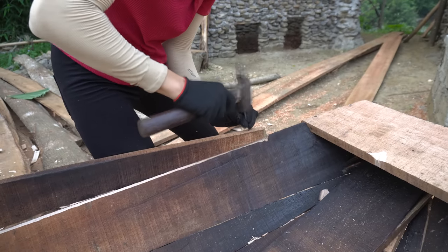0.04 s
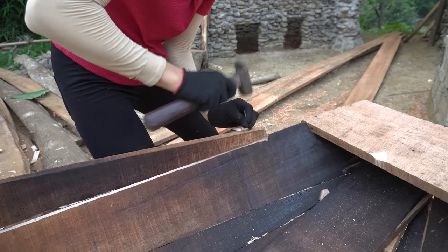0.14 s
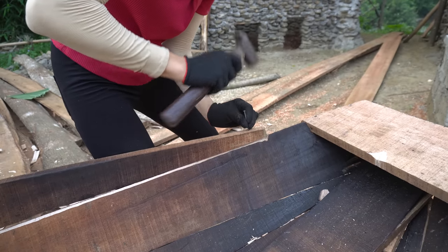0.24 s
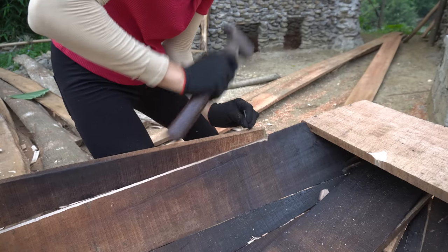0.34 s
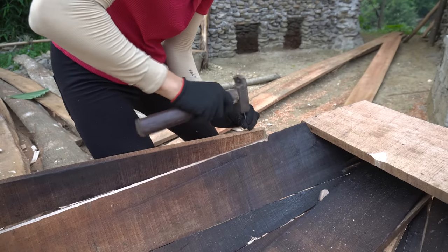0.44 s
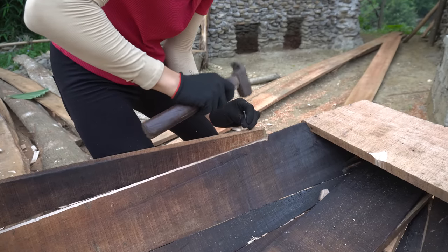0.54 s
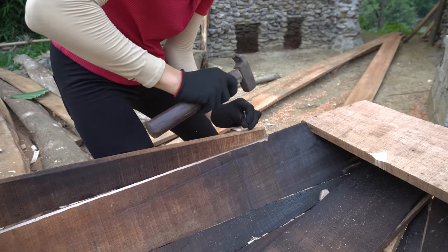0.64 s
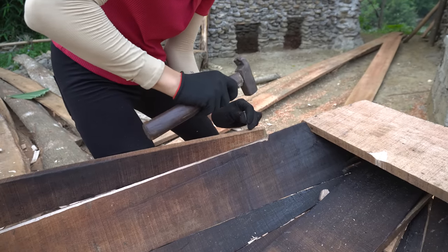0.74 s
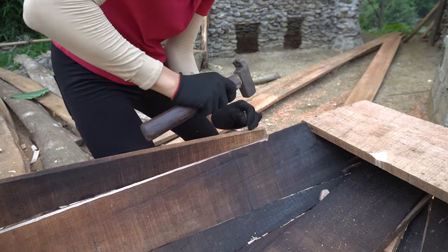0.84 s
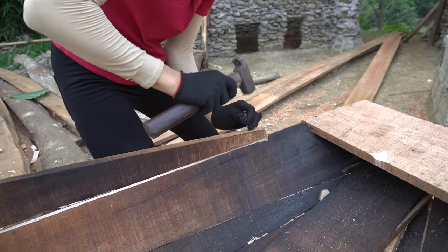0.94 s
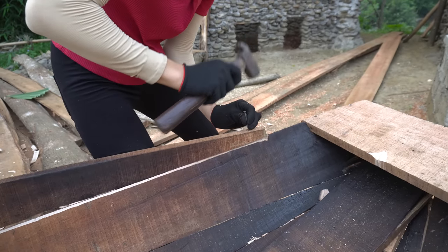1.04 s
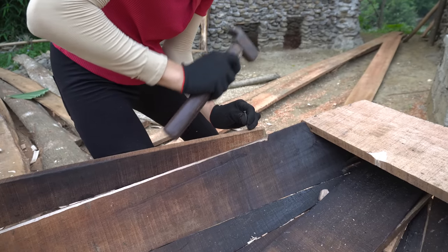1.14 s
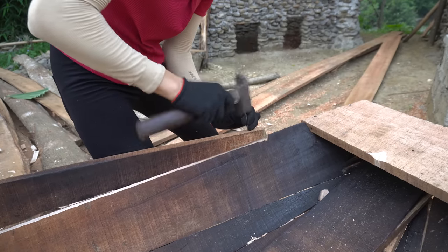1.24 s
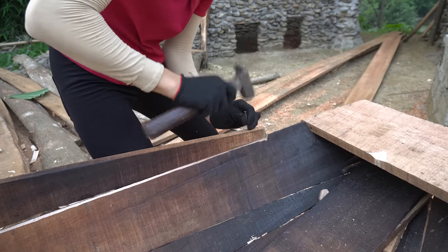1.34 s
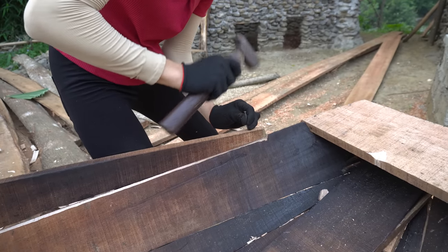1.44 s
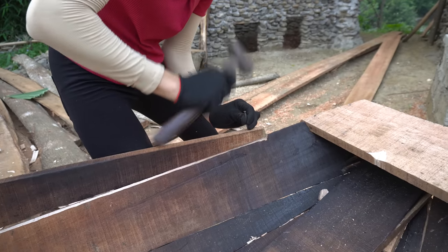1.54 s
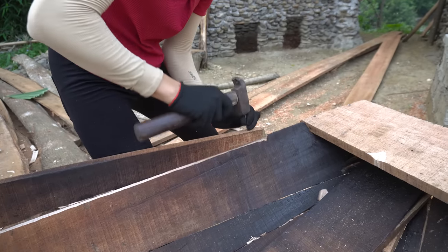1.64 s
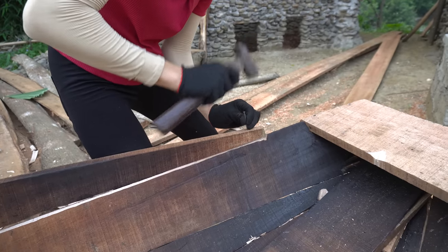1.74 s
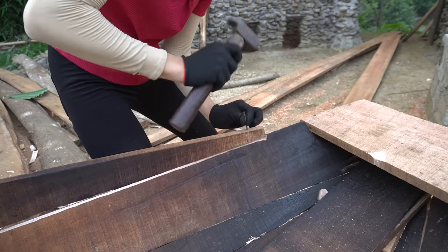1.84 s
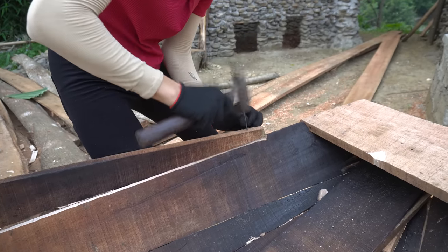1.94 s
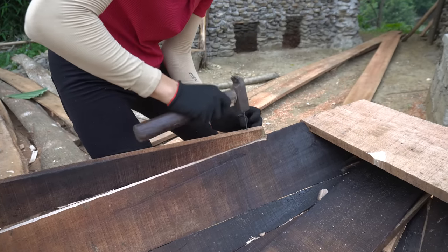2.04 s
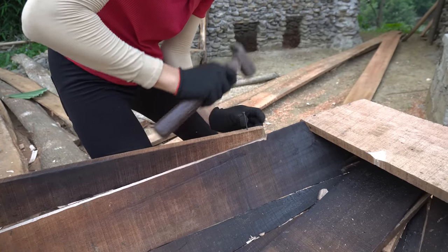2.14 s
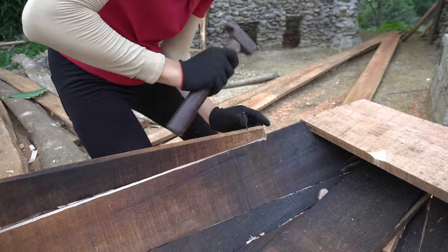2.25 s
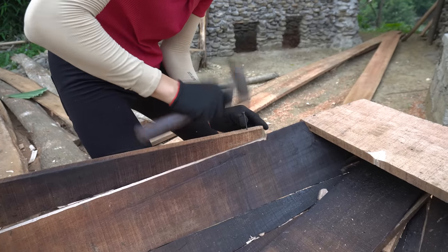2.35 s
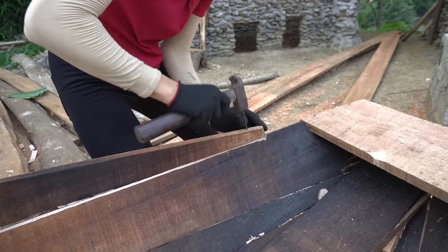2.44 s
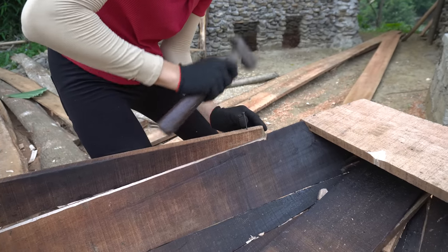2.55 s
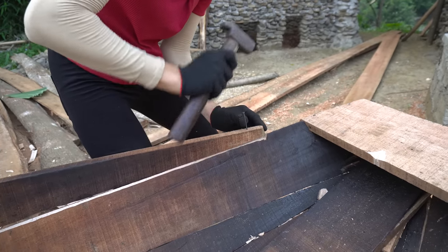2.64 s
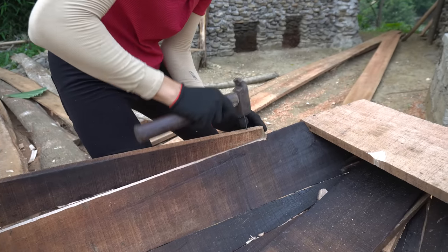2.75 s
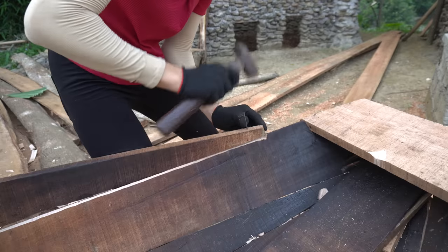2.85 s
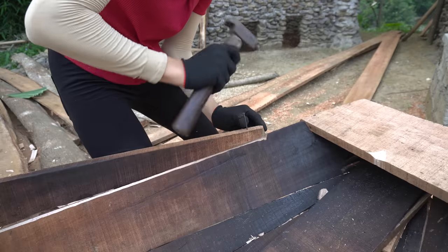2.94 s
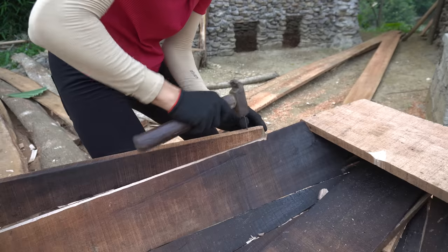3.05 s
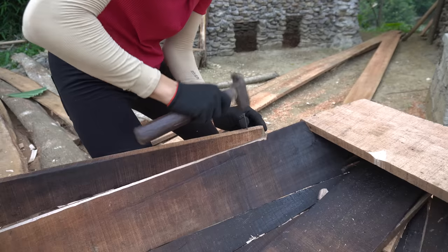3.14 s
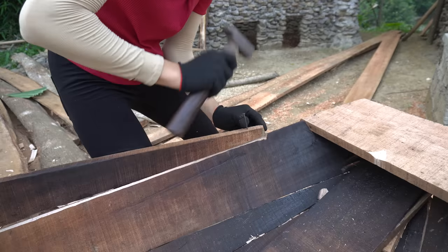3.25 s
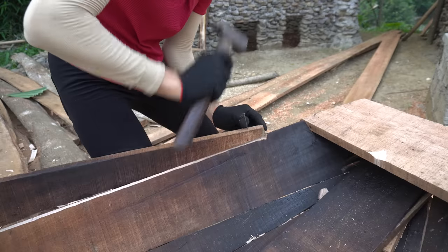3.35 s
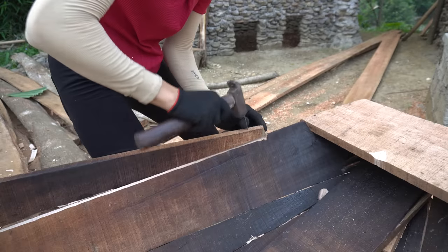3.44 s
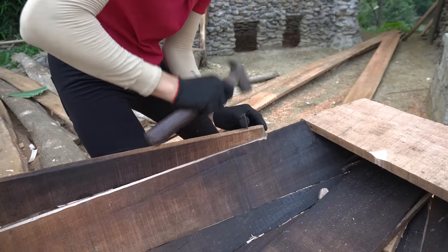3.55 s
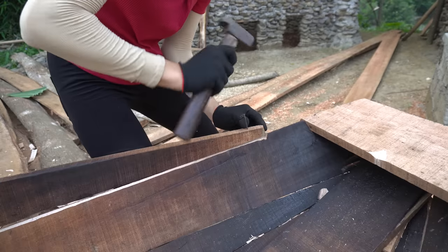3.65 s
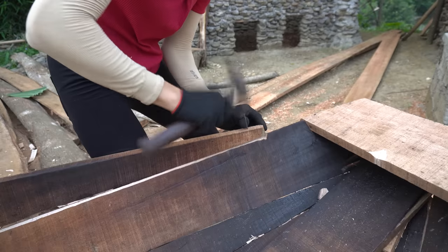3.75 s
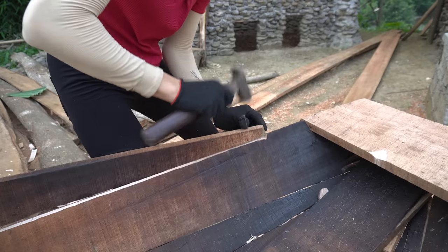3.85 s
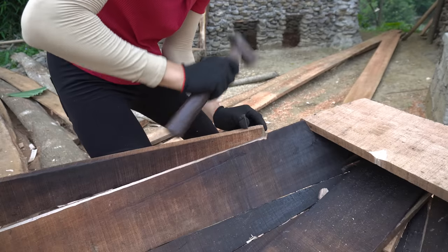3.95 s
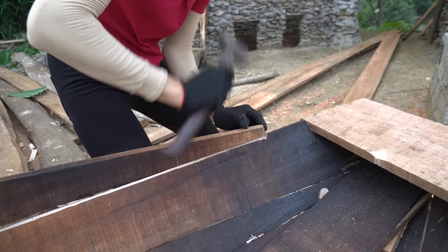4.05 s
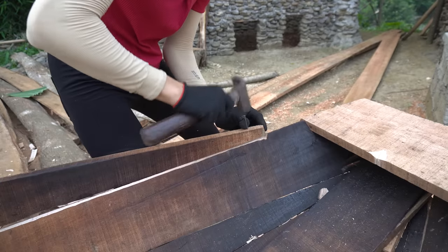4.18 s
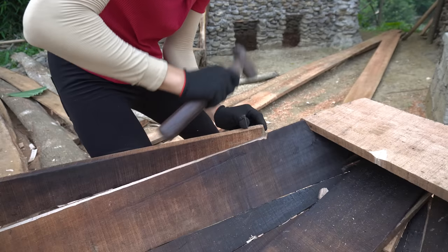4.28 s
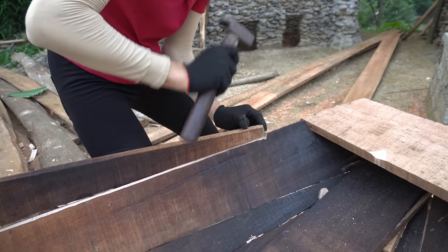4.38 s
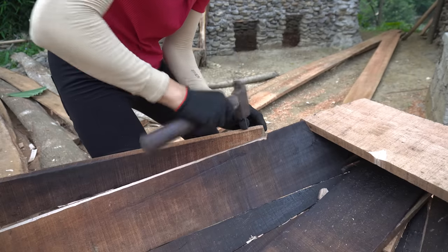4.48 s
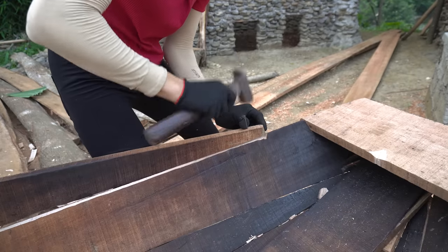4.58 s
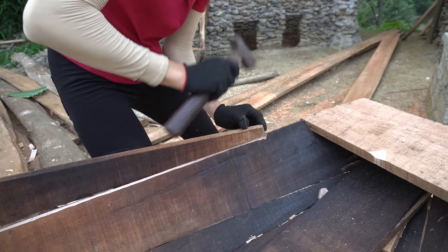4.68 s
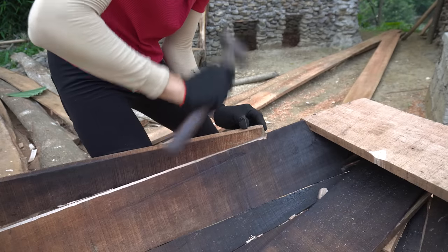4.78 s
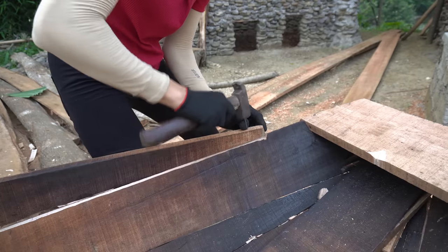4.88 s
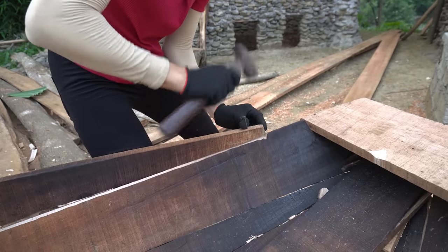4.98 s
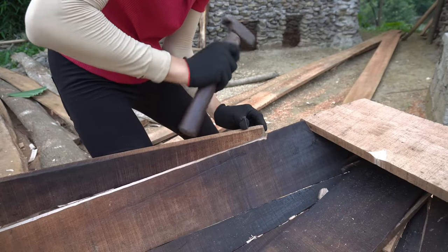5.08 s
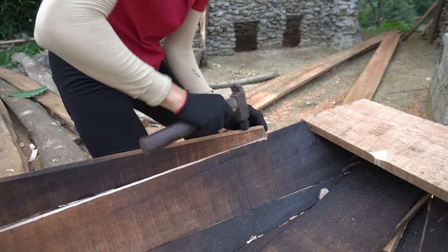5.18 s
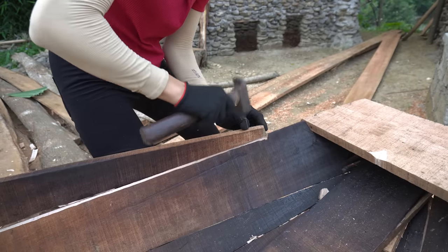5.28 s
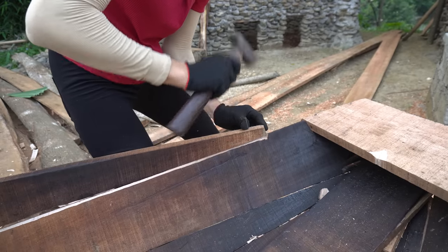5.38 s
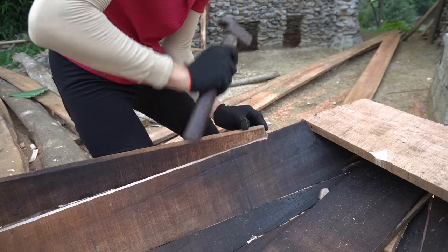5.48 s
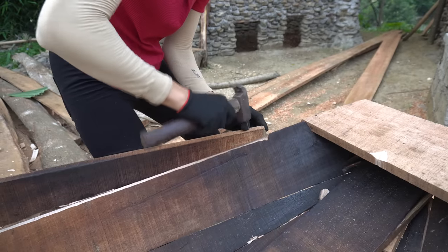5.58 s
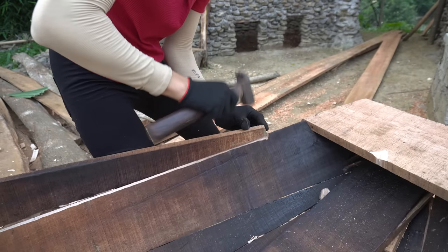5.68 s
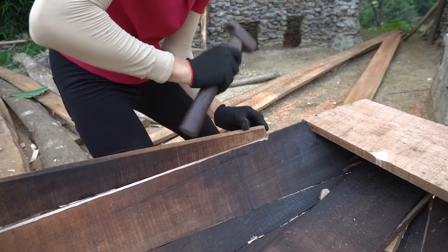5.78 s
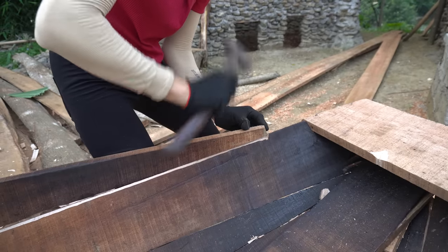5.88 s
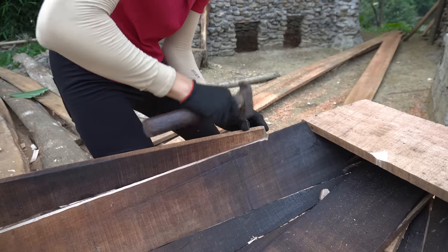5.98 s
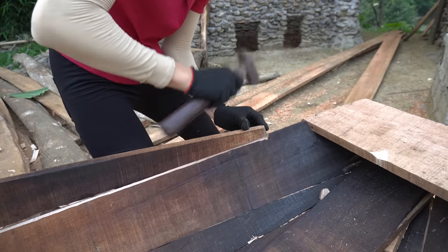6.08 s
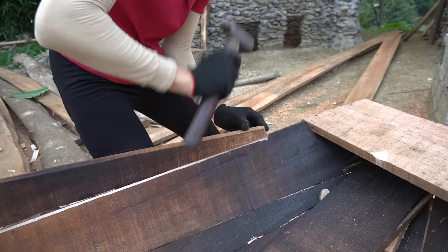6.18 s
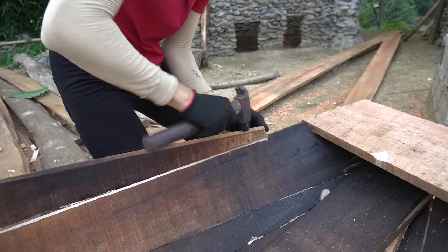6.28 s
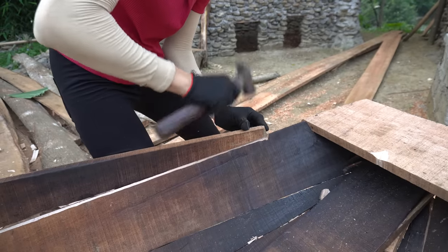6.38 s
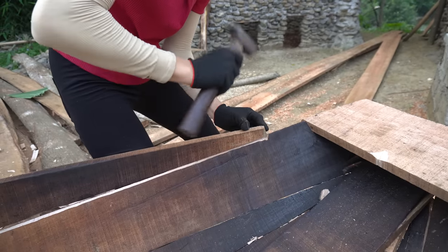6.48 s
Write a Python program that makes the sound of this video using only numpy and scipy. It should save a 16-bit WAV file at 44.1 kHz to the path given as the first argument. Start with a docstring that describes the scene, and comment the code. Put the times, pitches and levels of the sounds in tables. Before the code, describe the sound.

Loud, close hammering on a hollow wooden boat hull: sharp steel ticks, woody cracks and a squashed boom swelling just after each attack. After two opening blows and a short gap, the beat stays even until the end, getting brighter as the nail tightens and more hollow at the last. Sleeve cloth rustles faintly; a stone wall returns a dim echo. Distant birds and thin insect hiss sit in the quiet open air.

```python
"""In a farmyard, a hammer drives a nail into the end of a wooden boat's hull planks, close to two microphones.
Each blow is a modal impact: steel ticks, the plank is shoved, the hull booms; yard and stone wall answer.
The blows brighten as the nail grips, and turn hollow and sharp-edged as it sinks home.
A limiter squashes each attack, so the boom swells after it. Sleeve and glove rustle as shaped noise.
Far birds are gliding sines; the outdoor air and the insects are filtered noise."""
import sys
import numpy as np
from scipy import signal
from scipy.fft import rfft, irfft, next_fast_len
from scipy.io import wavfile
from scipy.ndimage import uniform_filter1d, minimum_filter1d

SR = 44100
rng = np.random.default_rng(int(sys.argv[2]) if len(sys.argv) > 2 else 0)


def master_out(mix):
    """Clip the mix to full scale and print it as 16-bit PCM to the path in sys.argv[1]."""
    frames = np.transpose(np.atleast_2d(mix))
    ceiling = np.clip(frames, -1, 1)
    pcm = np.round(ceiling * 32767).astype(np.int16)
    wavfile.write(sys.argv[1], SR, pcm)


N = 287532  # length in samples
T = np.arange(SR) / SR  # time since a blow, s

# hammer blows: t/s, force level/dB, ring of the steel head/dB relative to the force,
# sleeve rustle on the downswing/dB
BLOWS = [(0.0497, -4.5, -44, -48), (.422, -4.5, -46, -54), (1.2481, -7, -47, -61), (1.5994, -4.5, -41, -51),
         (1.973, -4, -39, -47.5), (2.379, -5, -46, -51.5), (2.7205, -5, -43, -68), (3.073, -4.5, -45, -75),
         (3.4256, -4.5, -38, -63), (3.7777, -4, -46, -70), (4.126, -4, -34.5, -52), (4.484, -4, -46, -74),
         (4.845, -3.5, -39, -62), (5.1883, -4, -38, -44.5), (5.5656, -4.5, -50, -51),
         (5.9199, -4.5, -45, -55), (6.2683, -5, -42, -64)]
# dense rattle of the joined planks: f/Hz, relative spectral level/dB
CLATTER = [(40, -53), (150, -3), (400, 0.5), (900, 4), (1400, -6), (2000, -13.5), (2700, -18),
           (4000, -29.5), (8000, -56), (16000, -50)]
# outdoor background noise: f/Hz, relative spectral level/dB
AIR = [(15, -43), (25, 1.5), (373, -7.5), (463, -9), (775, -8), (840, -11), (936, -7), (1290, -11),
       (1400, -11), (2000, -11.5), (2410, -10), (4610, -19.5), (7110, -18.5), (8360, -20), (16000, -29)]


def from_db(db):
    """Level to amplitude: 20 dB is a factor of ten."""
    return 10 ** (np.asarray(db) / 20)


def evened(x):
    """Normalization to unit root-mean-square amplitude."""
    return x / np.sqrt(np.mean(x ** 2) + 1e-20)


def read(points, hz):
    """Linear interpolation of a curve over logarithmic frequency."""
    f, value = np.transpose(points)
    return np.interp(np.log(hz + 1), np.log(f), value)


def add(mix, s, sound):
    """Superposition: a sound joins the mix from time s, cut off at its end."""
    part = mix[:, round(s * SR):][:, :sound.shape[-1]]
    part += sound[..., :part.shape[1]]


def colour(x, gain_db):
    """Linear filtering: the spectrum is multiplied by a gain given as a function from Hz to dB."""
    size = next_fast_len(x.shape[-1] + 4096)
    gain = from_db(gain_db(np.fft.rfftfreq(size, 1 / SR)))
    return irfft(rfft(x, size) * gain, size)[..., :x.shape[-1]]


def diffuse(spectrum, size):
    """Diffuse-field coherence: noise at two microphones is alike in the bass, nearly unrelated in the treble."""
    # correlation of the two microphones: f/Hz, likeness (0-1)
    likeness = [(100, 1), (300, .99), (600, .92), (1100, .75), (2100, .35), (4000, .15), (16000, .1)]
    hz = np.fft.rfftfreq(size, 1 / SR)
    a, b = rfft(rng.standard_normal((2, size)))
    same = np.clip(read(likeness, hz), -1, 1)
    mid = a * np.sqrt(1 + same)
    side = b * np.sqrt(1 - same)
    pair = np.array([mid + side, mid - side])
    return evened(irfft(pair * from_db(read(spectrum, hz)), size))


def dying(noise, t60s):
    """Frequency-dependent damping: each band falls 60 dB in its own decay time."""
    hz, t, bands = signal.stft(noise, SR, nperseg=256)
    bands = bands * from_db(-60 * t / read(t60s, hz)[:, None])
    return signal.istft(bands, SR, nperseg=256)[1][:, :len(T)]


def ring(hz, db, t60):
    """Free vibration of one struck mode: an exponentially damped sine."""
    return from_db(db) * np.exp(-np.log(1000) * T / t60) * np.sin(2 * np.pi * hz * T)


def struck(modes, scatter_db, detune):
    """Modal superposition: listed neighbours swing in antiphase; chance shifts stand for the spot struck."""
    total = 0
    chance = rng.standard_normal((len(modes), 2))
    for k, ((hz, db, t60), (a, b)) in enumerate(zip(modes, chance)):
        total = total + (-1) ** k * ring(hz * (1 + detune * b), db + scatter_db * a, t60)
    return total


def background(air_db=-56.5, flutter_db=-1.0):
    """Broadband and narrow-band noise: soft outdoor air, with bands of insect song wavering in level."""
    # far insects: f/Hz, half-width at -6 dB/Hz, mean level/dB
    insects = [(4650, 470, -68.5), (8000, 520, -67.5)]
    out = from_db(air_db) * diffuse(AIR, N)
    for centre_hz, width_hz, db in insects:
        song = colour(rng.standard_normal((2, N)),
                      lambda hz: -20 * np.log10(1 + ((hz - centre_hz) / width_hz) ** 4))
        swell = evened(uniform_filter1d(rng.standard_normal(N), size=6000))
        out = out + from_db(db + flutter_db * swell) * evened(song)
    return out


def rustle(length, centre_hz, width_hz, db):
    """Friction noise: one short swell of band-passed noise, 6 dB down at width_hz from its centre."""
    noise = colour(diffuse(AIR, len(T)), lambda hz: -20 * np.log10(1 + ((hz - centre_hz) / width_hz) ** 2))
    swell = signal.windows.tukey(round(np.clip(length, .02, .9) * SR), .8)
    return from_db(db) * evened(noise)[:, :len(swell)] * swell


def rustles(swing_s=0.32, swing_lead_s=0.034):
    """Cloth friction: the sleeve rustles on every downswing; the gloved hand shifts on the wood in a pause."""
    # scuffs of the glove: t/s, length/s, level/dB
    scuffs = [(.763, 0.11, -53.5), (1.089, .13, -51.5)]
    out = np.zeros((2, N))
    for s, _, _, sleeve_db in BLOWS:
        # the swell is centred swing_lead_s before the blow, unless that would start it before time zero
        start = max(s - swing_lead_s - swing_s / 2, 0)
        add(out, start, rustle(swing_s, centre_hz=338, width_hz=155, db=sleeve_db))
    for s, length, db in scuffs:
        add(out, s, rustle(length, centre_hz=1340, width_hz=580, db=db))
    return out


def nail(s, grip_s=5.13, home_s=5.55, sinking_s=1):
    """Contact stiffening: grip rises until grip_s; sinking home spans sinking_s about home_s; both 0-1."""
    grip = np.clip(s / grip_s, 0, 1)
    home = np.clip(.5 + (s - home_s) / sinking_s, 0, 1)
    return grip, home


def contact(shove_db=17, shove_time=0.0006, crack_time=0.0032):
    """Impulsive excitation where steel meets wood: a bright tick, a splintery crack, one shove of the plank."""
    # short rings at the point of contact: f/Hz before detuning, level/dB, t60/s
    tick_modes = [(976, -8, 0.061), (1520, -2, 0.006), (1800, 0, 0.057), (2433, -1, 0.044),
                  (2710, 3.5, 0.013), (3350, -3, 0.016), (4450, 5.5, 0.0044), (6970, 5, 0.0035),
                  (8320, 16, 0.0018), (10750, 15.5, 0.0016), (12530, 5.5, 0.0018), (14300, 7, 0.00082)]
    tick = struck(tick_modes, scatter_db=0, detune=0.027)
    decay = np.exp(-T / 0.00011) + .5 * np.exp(-T / crack_time)
    crack = from_db(6.5) * rng.standard_normal((2, len(T))) * decay
    # colour of the crack: f/Hz, gain/dB
    crack_curve = [(800, -24), (1500, 0.0), (2800, 16.5), (4500, 4.5), (6000, 6.0), (9000, 3),
                   (13500, -5), (16000, -18.5)]
    crack = colour(crack, lambda hz: read(crack_curve, hz))
    # the plank draws away from the microphones, then springs back more slowly
    u = T / shove_time
    shove = np.e * u * (1 - u / 2) * np.exp(-u)
    return crack - tick - from_db(shove_db) * shove


def hull(grain, ragged_db=2):
    """Modal and statistical vibration: strong modes over a ragged rattle, part of it repeating (grain)."""
    # modes of the hull: f/Hz before detuning, mean relative level/dB, t60/s
    hull_modes = [(33.3, -36, 1), (69.1, -19.5, 0.57), (84.3, -9, 0.27), (96.24, -10.5, 0.67),
                  (114.57, -20.5, 0.69), (134, -9, 0.41), (146.35, -3, 0.32), (181.32, -2.5, 0.45),
                  (210.7, -6.5, 0.43), (230.1, -1.5, 0.21), (255.8, -11.5, 0.43), (290.2, 5.5, 0.22),
                  (301, -7.5, 0.26), (361.6, -2, 0.17), (400.6, -3, 0.2), (451, -12, 0.24),
                  (519.7, -5.5, 0.17), (560, 0, 0.15), (606.5, 2, 0.16), (668, -7, 0.16),
                  (740.4, 0.5, 0.11), (808, -6, 0.18), (837, 2, 0.15), (948, 7.5, 0.11), (992, 5.5, 0.085),
                  (1057, 7.5, 0.1), (1250, -13, 0.13), (1230, -4.5, 0.036), (1370, 3.5, 0.086),
                  (1458, 0.5, 0.062)]
    # decay of the rattle: f/Hz, t60/s
    clatter_t60 = [(150, 0.36), (450, .16), (1000, 0.12), (2500, 0.19), (8000, 0.03)]
    chatter = from_db(ragged_db * evened(uniform_filter1d(rng.standard_normal(len(T)), size=160)))
    fresh = chatter * diffuse(CLATTER, len(T))
    rattle = dying(from_db(6.0) * grain + from_db(3) * fresh, clatter_t60)
    boom = from_db(-1.5) * struck(hull_modes, scatter_db=1.76, detune=0.0034)
    # the motion takes a moment to spread
    return (boom + rattle) * (1 - np.exp(-T / 0.00013))


def yard(treble_db, patchy_db=1.5):
    """Reverberation by scattering: uneven clumps of sound from the ground, timber and buildings."""
    # reverberation: f/Hz, relative spectral level/dB
    yard_spectrum = [(40, 2.5), (250, 6), (600, -15.5), (1100, -12), (2300, -15), (3700, -16.5),
                     (5500, -13), (8000, -11.5), (11000, -18.5), (15500, -26.5)]
    # its decay: f/Hz, t60/s
    yard_t60 = [(150, 0.46), (1000, 0.52), (3000, 0.36), (8000, 0.26), (15000, 0.26)]
    clumps = evened(uniform_filter1d(rng.standard_normal(len(T)), size=130))
    build_up = 1 - np.exp(-T / 0.018)
    tail = dying(diffuse(yard_spectrum, len(T)), yard_t60) * build_up * from_db(patchy_db * clumps)
    # the gain approaches treble_db toward high frequencies
    return from_db(-13.5) * colour(tail, lambda hz: treble_db * hz / (hz + 1500))


def wall_echo(x, delay=.141, spread=0.01):
    """Rough-surface reflection: a stone wall returns the mid frequencies late (s), smeared over spread (s)."""
    stones = rng.standard_normal((2, len(T))) * np.exp(-T / spread)
    back = signal.fftconvolve(x, stones / np.linalg.norm(stones[0]), axes=1)[:, :N]
    # reflection of the wall: f/Hz, gain/dB
    wall_curve = [(300, -62.0), (1000, -41.5), (1900, -36.0), (3000, -49.5), (7000, -83)]
    echo = np.zeros((2, N))
    add(echo, delay, colour(back, lambda hz: read(wall_curve, hz)))
    return echo


def microphones(x, lag_radians=0.27):
    """Interchannel level and phase: the ports differ in level; above the deep bass the left lags slightly."""
    # level difference: f/Hz, left minus right/dB
    balance_db = [(120, 0), (300, .5), (600, 1.2), (1100, 3.3), (2200, .5), (4000, -.3), (9000, 1.6),
                  (15000, 2.6)]
    size = next_fast_len(N + 4096)
    hz = np.fft.rfftfreq(size, 1 / SR)
    # half of each difference goes to either side
    ratio = from_db(read(balance_db, hz) / 2) * np.exp(-.5j * lag_radians * hz / (hz + 100))
    return irfft(rfft(x, size) * np.array([ratio, 1 / ratio]), size)[:, :N]


def hammering(loose_treble_db=-7.5, tight_treble_db=0):
    """Impact excitation: blows drive contact, hull, steel ring and yard; the nail's grip sets their colour."""
    # the hammer head falls back on the wood: t/s, force level/dB
    rebounds = [(2.0163, -28.5)]
    # colour of a blow on the loose nail: f/Hz, gain/dB
    loose = [(290, 0.5), (400, -2), (600, -1), (1000, -3.5), (2600, -5.5), (9000, -2), (13500, 3)]
    # colour of a blow on the tight nail: f/Hz, gain/dB
    tight = [(290, -0.5), (400, 0), (600, -1.5), (1000, 0.5), (2600, 2), (9000, 3), (13500, -2)]
    # hollow note and sharp top edge added as the nail sinks home: f/Hz, gain/dB
    sunk = [(290, 0), (400, 5.5), (600, 3), (1000, -0.5), (2600, -1.5), (10500, -1.5), (13500, 10)]
    near, far = np.zeros((2, 2, N))
    grain = diffuse(CLATTER, len(T))  # the part of the rattle that every blow shares
    for s, force_db, steel_db, _ in BLOWS:
        grip, home = nail(s)
        wood = colour(contact() + hull(grain),
                      lambda hz: (1 - grip) * read(loose, hz) + grip * read(tight, hz) + home * read(sunk, hz))
        steel = ring(hz=5513, db=steel_db, t60=0.45)
        add(near, s, from_db(force_db) * (wood + steel))
        treble_db = (1 - grip) * loose_treble_db + grip * tight_treble_db
        add(far, s, from_db(force_db) * yard(treble_db))
    for s, force_db in rebounds:
        add(near, s, from_db(force_db) * (contact() + from_db(-6.5) * hull(grain)))
    return microphones(near + far + wall_echo(near))


def birds(waver=0.013, wet=1.0, glide_bend=1.8, note_fade=0.48):
    """Frequency modulation and reverberation: thin gliding notes, blurred by distance."""
    # far bird notes: t/s, length/s, first f/Hz, last f/Hz, level/dB before the blur is added
    bird_notes = [(0.259, 0.12, 2730, 2400, -63.5), (.615, 0.055, 1500, 1500, -52.5),
                  (0.655, .13, 2100, 2060, -56.5), (.68, 0.166, 1462, 1403, -58.5),
                  (0.767, 0.225, 2016, 1927, -52.5), (0.841, 0.046, 5840, 2460, -50.5),
                  (2.134, 0.32, 1440, 1370, -59), (2.26, 0.097, 2660, 2780, -60.5),
                  (3.022, 0.036, 4300, 2620, -53), (3.352, 0.051, 765, 737, -55)]
    notes = np.zeros((2, N))
    for s, length, first_hz, last_hz, db in bird_notes:
        t = np.arange(0, length, 1 / SR)
        # the glide is fast at first and levels off
        glide = np.expm1(-glide_bend * t / length) / np.expm1(-glide_bend)
        hz = first_hz + (last_hz - first_hz) * glide
        wobble = 1 + waver * evened(uniform_filter1d(rng.standard_normal(len(t)), size=150))
        tone = np.sin(2 * np.pi * np.cumsum(hz * wobble) / SR)
        # note_fade is the share of the length spent fading in and out
        add(notes, s, tone * from_db(db) * signal.windows.tukey(len(t), note_fade))
    tail = rng.standard_normal((2, len(T))) * np.exp(-T / 0.065)
    blur = signal.fftconvolve(notes, tail / np.linalg.norm(tail[0]), axes=1)[:, :N]
    return notes + wet * blur


def scene():
    """Superposition of all the sources."""
    return hammering() + rustles() + background() + birds()


def record(dry, ceiling_db=-2.0, ahead=0.0025, hold=0.019, recover_db_per_s=580, edge_hz=16100):
    """Peak limiting: gain dives just ahead (s) of a peak, holds (s), then recovers; a low-pass follows."""
    room_db = np.minimum(ceiling_db - 20 * np.log10(abs(dry).max(0) + 1e-9), 0)
    lead, span = round(ahead * SR), round((ahead + hold) * SR)
    held_db = minimum_filter1d(room_db, span, origin=(span - 1) // 2 - lead)
    # the gain may rise no faster than the climb
    climb = recover_db_per_s * np.arange(N) / SR
    gain_db = uniform_filter1d(np.minimum.accumulate(held_db - climb) + climb, lead)
    lowpass = signal.firwin(255, edge_hz, window=("kaiser", 9), fs=SR)
    return signal.oaconvolve(dry * from_db(gain_db), lowpass[None], "same", axes=1)


dry = scene()
out = record(dry)
master_out(out)
```